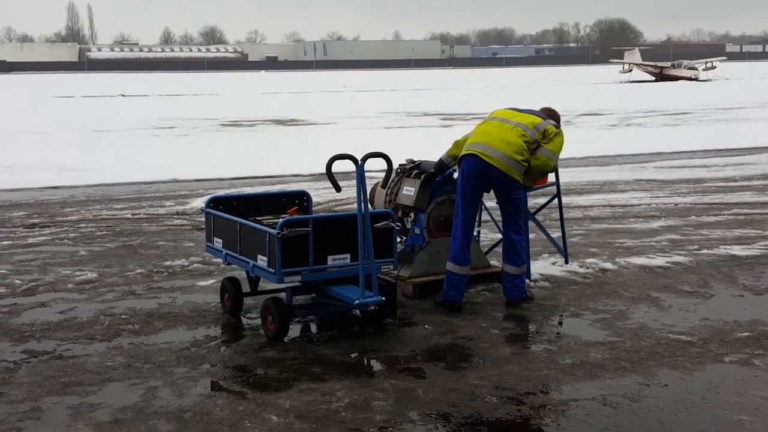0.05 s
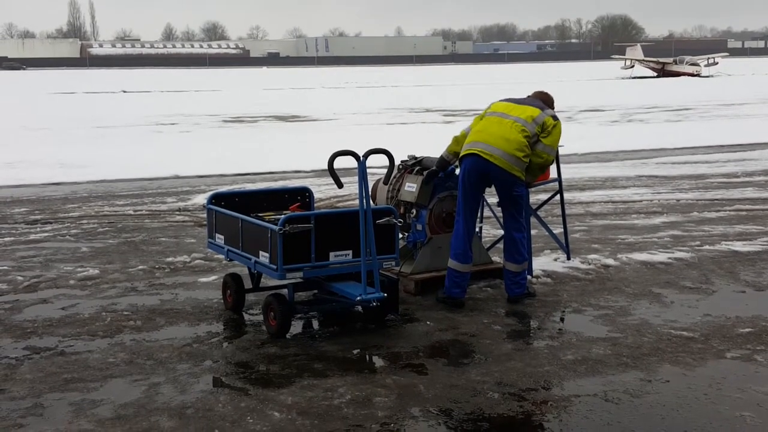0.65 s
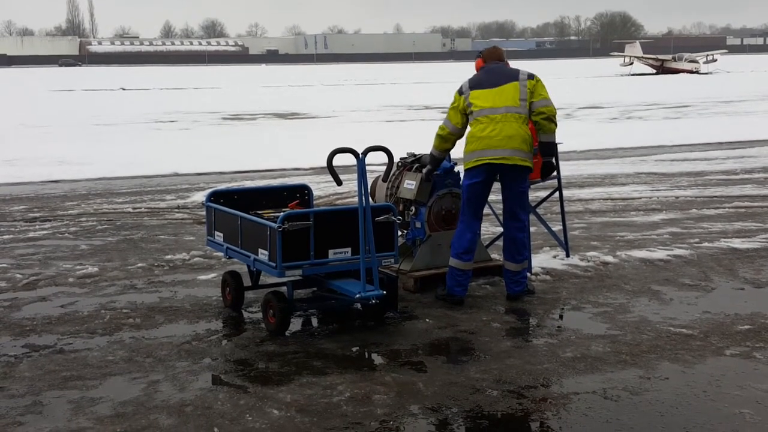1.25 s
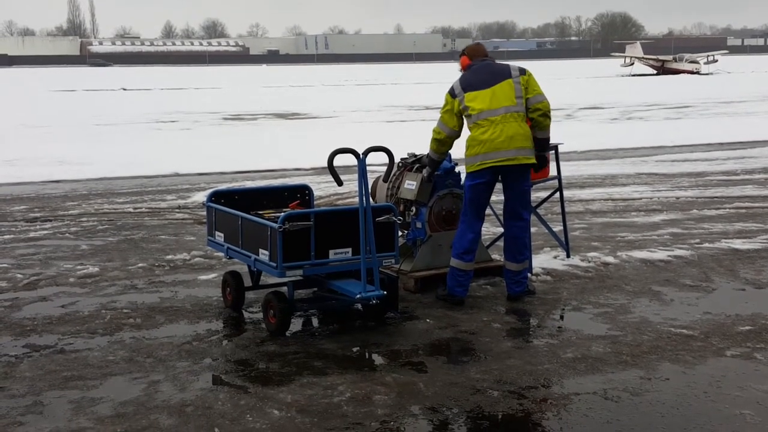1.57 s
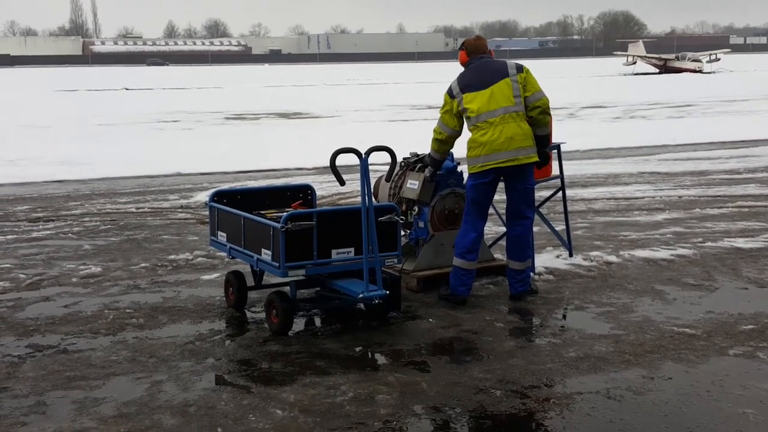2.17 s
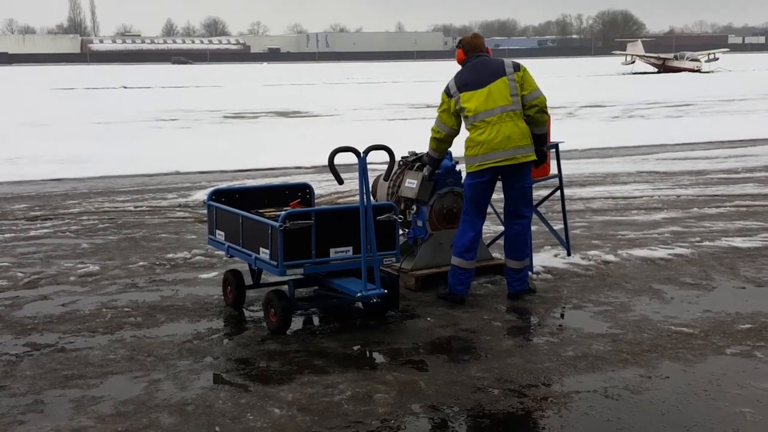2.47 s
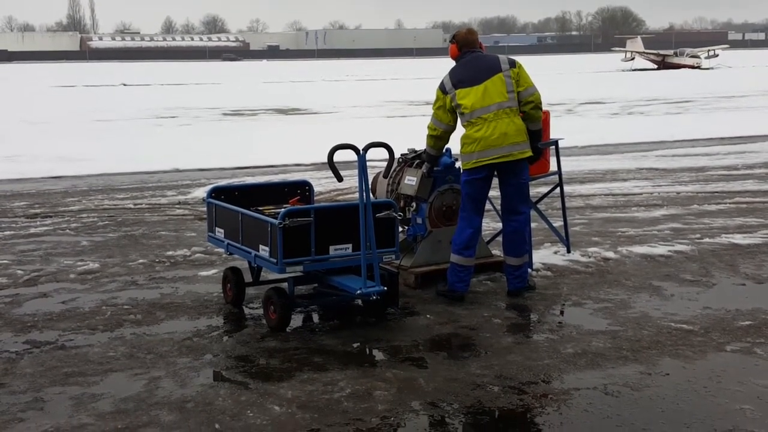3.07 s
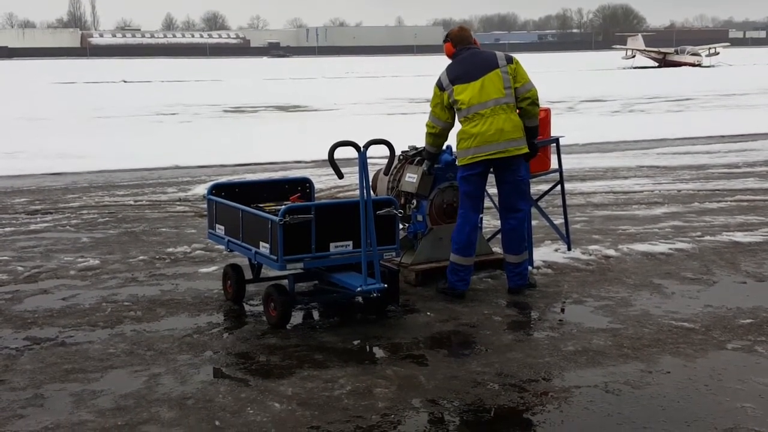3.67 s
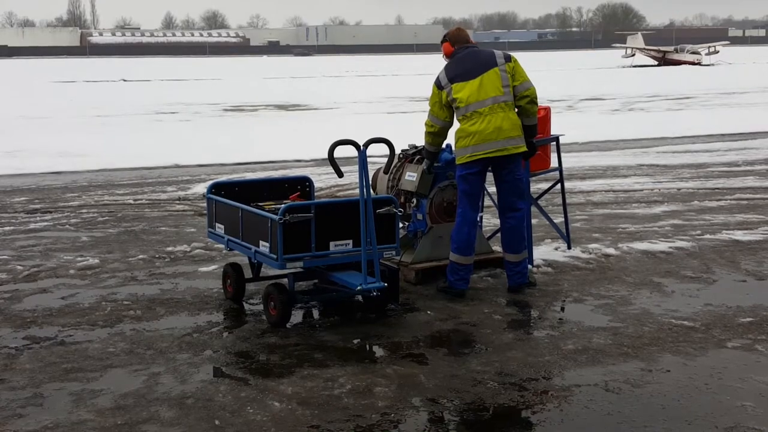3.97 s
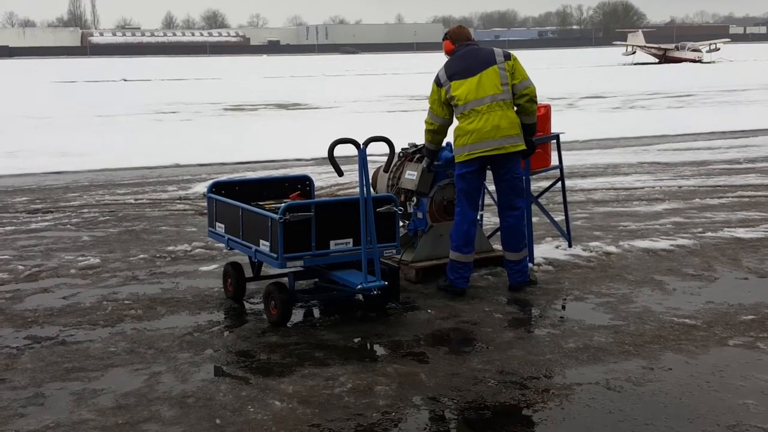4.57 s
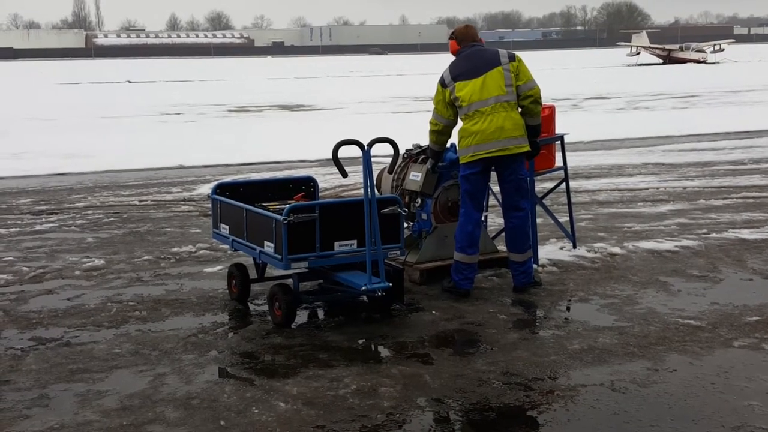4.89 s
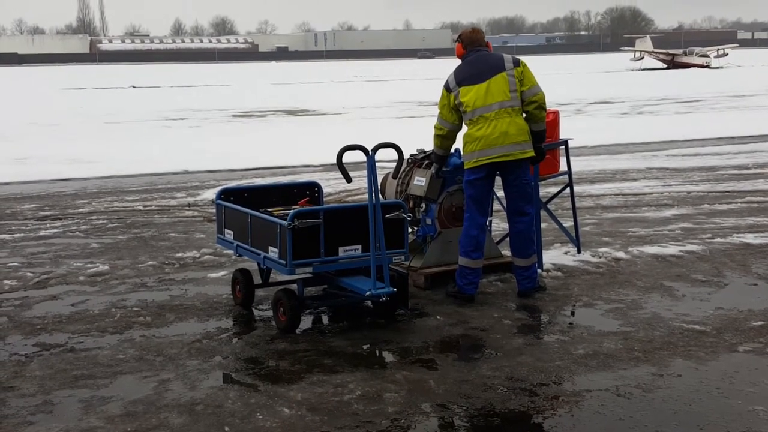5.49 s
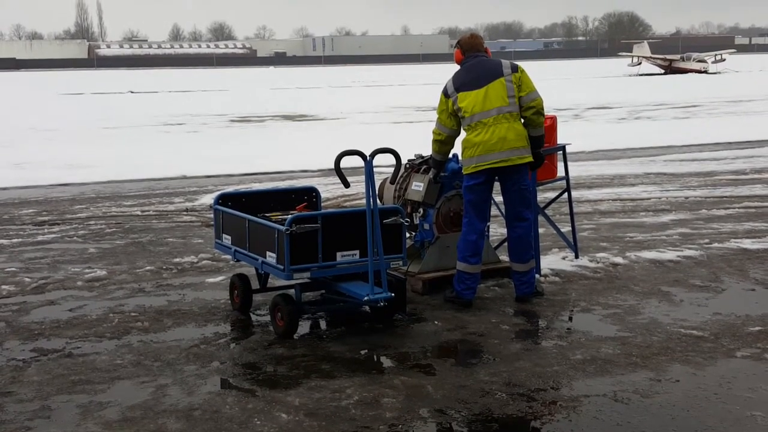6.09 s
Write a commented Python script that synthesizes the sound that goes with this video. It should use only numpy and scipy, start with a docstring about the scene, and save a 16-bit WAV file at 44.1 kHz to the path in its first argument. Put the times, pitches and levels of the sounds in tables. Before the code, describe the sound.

A small gas turbine runs at constant speed outdoors, a few metres from the microphone. Its loud whine and higher whistles flutter, swell and fade over rushing exhaust, a low combustion rumble and a thin intake hiss. Around the middle, wind buffets the microphone and the flame gives a few soft thumps, with more of both near the end. The treble sits mostly to the right.

```python
"""A small gas turbine runs at about 28,500 rpm on a stand in the open, a few metres away.
Its shaft and blades whine at harmonics of the rotation rate, fluttering in the turbulent air and slowly
swelling and fading. Under them combustion rumbles in the flame can, the exhaust jet rushes through the
resonances of its pipe and the intake hisses; the treble lies mostly to the right.
Wind adds a deep buffeting, and now and then the flame surges with a thump."""
import sys
import numpy as np
from scipy import signal
from scipy.fft import rfft, irfft
from scipy.io import wavfile
from scipy.ndimage import uniform_filter1d

SR = 44100
rng = np.random.default_rng(int(sys.argv[2]) if len(sys.argv) > 2 else 0)


def unload_wav(signal):
    """Save mono or channel-first audio to the path in sys.argv[1] as 16-bit WAV at rate SR, clipped to [-1, 1]."""
    wavfile.write(
        sys.argv[1],
        SR,
        np.round(np.clip(np.atleast_2d(signal).T, -1, 1) * 32767).astype(np.int16),
    )


N = 279594

# Shaft speed. Each row: time in seconds, rotation rate in Hz.
SHAFT_SPEED = [(0, 476.3), (.55, 475.92), (1.7, 475.84), (2.4, 475.94), (3.4, 475.89), (3.75, 475.7),
               (4.1, 475.05), (4.65, 474.72), (5.4, 475.24), (6.34, 475.28)]
# Shaft tones. Each row: harmonic number, left and right base levels in dB, flutter depth from 0 to 1.
HARMONICS = [(1, -36, -32, .25), (2, -20.4, -20.3, .13), (3, -33.3, -32.6, .35), (4, -46.5, -44.5, .5),
             (5, -45, -42, .5), (6, -54, -46, .4), (7, -38, -31.3, .33), (8, -36.5, -27.7, .25),
             (9, -53, -37, .42), (10, -55, -39.8, .4), (11, -61, -48, .5), (12, -52.5, -41.7, .5),
             (13, -57, -51, .4), (15, -59, -45.8, .3), (16, -42.5, -29.3, .1), (23, -70, -47, .45),
             (24, -53, -27.2, .28), (25, -61, -38, .35), (26, -68, -45, .4), (27, -70, -50, .4),
             (28, -66, -47, .4), (29, -66, -48, .4), (30, -63, -47, .4), (31, -58, -41, .35),
             (32, -46, -31.2, .22)]
# Swell and fade of the clearer tones, by harmonic number. Each row: time in seconds, gain in dB.
TONE_SWELL = { 1: [(0.0, 2), (0.8, -6), (1.8, -3), (3.3, 4), (4.5, -1.5), (6.34, 0)], 2: [(0.0, 0),
              (0.5, 1.0), (1.2, -1.5), (1.9, 0.5), (2.6, 0), (3.3, -2), (3.9, -0.5), (4.64, 0.5), (5.09, 0),
              (6.34, 1)], 3: [(0.0, 1), (1.42, -1), (1.84, 3), (2.2, 0), (2.34, 3), (2.84, -1.5),
              (3.94, 1.0), (5.4, -3), (6.34, -2)], 7: [(0.0, -3), (0.2, 3), (0.36, -3), (0.76, 0),
              (0.96, 4), (1.1, -10), (1.22, 2), (1.68, -6), (1.76, 2.5), (3.66, 2.5), (3.92, -3.5),
              (4.66, -1.5), (5.7, -4.5), (6.16, 2.5), (6.34, -1)], 8: [(0.0, -18), (0.14, 3), (0.2, -2.5),
              (0.68, 1), (0.88, -9), (1.1, 2.5), (1.44, -9), (1.56, -1), (2.32, -6), (2.56, -6),
              (2.86, -0.5), (3.92, -3.5), (4.0, 0), (4.84, 7), (5.06, 5), (5.64, 5), (5.76, -4), (5.96, 1),
              (6.14, -2.5), (6.34, 6)], 9: [(0, 4), (1.2, 2), (1.5, -4), (1.8, 3), (3.0, 3), (4.0, -8),
              (6.34, -3)], 12: [(0.0, -3), (1.2, 4), (1.7, 0), (2.3, 1), (3.4, -5.5), (4.2, 3), (5.0, 7),
              (6.34, -4)], 16: [(0.0, 3), (0.65, 5.8), (1.04, 4), (1.28, 0), (1.7, 4.5), (2.3, 4.6),
              (2.74, 3.3), (3.05, 5.6), (3.3, .3), (3.6, -1.5), (3.86, -9.5), (4.2, -4), (4.32, -10),
              (4.48, -6.5), (4.57, -12.5), (4.8, -4.5), (5.38, -2), (5.66, -6), (5.86, -2), (6.2, -2),
              (6.34, -7)], 24: [(0.0, -1), (0.3, 2), (1.42, 5), (2.18, -1), (2.62, 4), (2.76, -1),
              (3.56, 5), (3.74, 1.5), (3.82, 4.5), (4.12, -7), (4.2, 1), (4.46, -10), (4.6, -1), (4.76, -3),
              (4.84, 0), (4.94, -11), (5.08, -10), (5.14, 0), (5.28, 2.5), (5.68, 0.5), (5.9, 4), (6.0, -3),
              (6.2, 3), (6.34, -2.5)], 25: [(0, 2), (1.6, -3), (2.5, 5), (3.6, -6), (4.1, 1), (4.8, 3),
              (5.3, -1), (6.34, -4)], 32: [(0.0, 7), (0.34, -2), (0.46, -1), (0.88, 9), (1.0, 7), (1.18, 8),
              (1.52, -9.5), (1.78, 5), (2.24, 1), (2.74, 5), (2.88, -6.0), (3.06, 2), (3.32, 0), (3.42, 4),
              (3.84, 1), (4.02, -8), (4.68, 4), (4.8, -7.0), (4.84, 0), (5.4, -2), (5.52, 1), (5.6, -5),
              (5.84, 3), (5.98, -1.0), (6.02, 5), (6.34, 2)], }
# The same for three whistles at the shaded left ear. Each row: time in seconds, gain in dB.
LEFT_SWELL = { 7: [(0, 0), (.5, 6.5), (1.5, -2), (2.4, -16), (2.9, -15), (4.35, 2), (4.9, -1), (5.35, -7),
              (5.8, -2), (6.34, -6)], 8: [(0, -2), (.45, 6), (.8, -10), (1.3, -1), (1.7, -7), (2.3, 1),
              (3.3, -5), (4.6, 1), (5.25, -5), (6.34, -3)], 16: [(0, -14), (.5, 0), (.85, -4), (1.15, -20),
              (1.55, -4), (2.1, 2), (3.05, 2), (3.35, -8), (4.3, 1.5), (5.65, 3), (6.15, -2), (6.34, -15)],
              }
# Brief dips and flares of the main whine. Each row: centre in seconds, gain in dB, half length in seconds.
WHINE_DIPS = [(.02, -5, .025), (.498, -7, .011), (.858, -9, .012), (1.077, -7, .012), (1.67, -4, .03),
              (2.19, -6, .025), (2.25, 2.3, .035), (2.77, -8.5, .036), (2.86, 1.5, .04), (2.92, -8, .014),
              (2.955, -6, .025), (3.04, 2.5, .04), (3.41, -3, .02), (3.464, -8, .016), (3.85, -6, .012),
              (4.38, 2, .04), (5.115, -6, .025), (5.34, -4, .014), (5.73, -4.5, .018), (5.865, -7, .016)]
# Drifting node of the fundamental. Each row: time in seconds, phase lag at the left ear in radians.
NODE_LAG = [(0, 5.1), (2.9, 4.2), (3.4, 2.7), (6.34, 2.7)]
# Noise at the two ears. Each row: frequency in Hz, left minus right in dB, coherence from 0 to 1,
# left phase lag in radians.
INTERAURAL = [(30, -2, .9, .1), (206, -1, .97, .06), (378, 3.5, .9, .7), (524, -1, .82, .6),
              (650, 1, .9, .3), (1210, -2.5, .85, .9), (1600, -.5, .87, .8), (2050, -1.5, .72, .7),
              (2440, -1.3, .86, .75), (3000, -2.3, .6, 1.2), (3550, -4.5, .25, 1.2), (4200, -9.5, .55, .7),
              (5230, -11.5, .4, .1), (6060, -5, .42, .6), (10000, -24, .1, .4), (12500, -15.5, .15, 0),
              (15500, -12, 0, 0)]
# Strength of combustion. Each row: time in seconds, relative level in dB.
FLAME_LEVEL = [(0.0, -28.5), (0.45, -28.3), (0.52, -31), (0.6, -28), (0.96, -29), (1.58, -29),
               (1.74, -26.8), (2.5, -25.3), (2.95, -24.9), (3.25, -25.3), (3.7, -26.8), (3.85, -29),
               (4.8, -28), (5.0, -25.5), (5.5, -25.8), (5.76, -30.5), (6.2, -26), (6.34, -26.5)]
# Strength of the gas flow. Each row: time in seconds, relative exhaust and intake levels in dB.
GAS_FLOW = [(0.0, -22.2, -40.5), (0.4, -23.1, -41.5), (0.8, -22.8, -40), (1.1, -23.5, -40.5),
            (1.5, -24.8, -46.5), (1.8, -23.7, -42), (2.0, -24, -42.3), (2.25, -22.8, -42.5),
            (2.45, -24.2, -43), (3.44, -25.0, -45), (3.9, -24.2, -42.5), (4.32, -22.8, -41.5),
            (4.5, -24, -42), (4.84, -23.3, -40.5), (5.29, -25.3, -43.5), (5.85, -24.8, -42),
            (6.1, -23.3, -40), (6.34, -24.5, -40.5)]
# Resonances of the flame can (its deepest stands alone) and of the jet pipe.
# Each row: frequency in Hz, width in Hz, relative peak in dB.
DEEPEST_CAN_MODE = (155.3, 27, -6)
CAN_MODES = [(186.2, 55, -0.5), (219.7, 45, 2), (291.8, 15.3, -0.5), (334, 39, -8.5), (384.4, 50, -4),
             (441, 82, -9)]
JET_PIPE_MODES = [(601, 76, -1), (680, 106, 0.5), (942, 182, 2.5), (1263, 130, -4.5), (1638, 350, 2.5),
                  (1890, 103, 0.5), (2380, 340, 0.5), (3096, 75, -5), (3937, 320, -3), (4460, 150, -4.5),
                  (5180, 105, -6)]
# Broad spectra of burner, jet, intake and wind. Each row: frequency in Hz, relative density in dB.
RUMBLE_SPECTRUM = [(15, -55), (60, -32), (110, -26), (300, -24), (500, -27), (900, -78)]
JET_SPECTRUM = [(300, -27), (520, -9), (800, -3), (1150, -6.5), (1400, -5.5), (2600, -5.5), (3300, -8.5),
                (3700, -8.5), (4200, -5.5), (5200, -9), (6700, -17), (7700, -16), (8400, -35.5),
                (11000, -96)]
HISS_SPECTRUM = [(8500, -42), (9400, -26.5), (10000, -7.5), (10700, -1), (11150, 6), (11420, 5.5),
                 (11700, 7), (12200, 0), (13000, 3.5), (16000, -1)]
WIND_SPECTRUM = [(12, -34), (30, -20), (60, 0.5), (100, 4), (150, 3.5), (260, -15), (600, -54)]
# Gusts. Each row: centre in seconds, rise over the breeze in dB, half length in seconds.
WIND_GUSTS = [(2.77, 8, .16), (3.17, 10, .27), (3.6, 6, .09), (5.32, 6, .08)]
# Flame surges. Each row: centre in seconds, peak in dB, half length in seconds, ringing frequency in Hz.
FLAME_SURGES = [(2.89, -18.5, .02, 212), (2.995, -24, .022, 205), (3.135, -22.5, .022, 196),
                (3.345, -15.5, .022, 188), (4.41, -24, .03, 219), (5.103, -16.5, .021, 203),
                (6.247, -18, .024, 216)]

GUST_SHADE = 0.28  # dB lost per dB of gust by the low tones on the left and by the pipe's drone


def undb(db):
    """Amplitude ratio for a level in decibels."""
    return 10 ** (np.asarray(db) / 20)


def unit(x):
    """Normalisation to an rms of 1."""
    return x / np.sqrt(np.mean(np.abs(x) ** 2))


def curve(rows, axis=1):
    """Linear interpolation of one column of a time table at every sample."""
    rows = np.array(rows)
    return np.interp(np.arange(N) / SR, rows[:, 0], rows[:, axis])


def bumps(rows):
    """Superposition of Gaussian pulses, one for each row of centre, height and half length."""
    t = np.arange(N) / SR
    return sum(height * np.exp(-((t - at) / half_s) ** 2) for at, height, half_s in rows)


def wander(count):
    """Slow random modulation: `count` random levels joined smoothly, with an rms of 1."""
    steps = np.interp(np.linspace(0, count - 1, N), np.arange(count), rng.standard_normal(count))
    return unit(uniform_filter1d(steps - steps.mean(), N // count // 2))


def bins():
    """Frequencies in Hz of the Fourier spectrum of the whole sound."""
    return np.maximum(np.arange(N // 2 + 1) * SR / N, 1)


def colour(rows, axis=1):
    """Interpolation of one column of a frequency table over log frequency, at every bin."""
    rows = np.array(rows)
    return np.interp(np.log(bins()), np.log(rows[:, 0]), rows[:, axis])


def resonances(modes):
    """Power response of steep-sided resonances, whose powers add."""
    f = bins()
    return sum(undb(db) ** 2 / (1 + ((f - hz * hz / f) / width) ** 2) ** 2 for hz, width, db in modes)


def turbulence(gain):
    """Coloured noise at two ears: coherent in the bass, largely incoherent and shaded left in the treble."""
    shared, own = rfft(rng.standard_normal((2, N)))
    coherence = np.clip(colour(INTERAURAL, axis=2), 0, 1)
    delayed = shared * np.exp(-1j * colour(INTERAURAL, axis=3))
    left = (coherence * delayed + np.sqrt(1 - coherence ** 2) * own) * undb(colour(INTERAURAL))
    pair = irfft(np.array([left, shared]) * gain, N)
    return pair / np.std(pair.mean(axis=0))


def eddies(corner_hz=25.5, hop=32):
    """Scattering by eddies: a complex random modulation of amplitude and phase, strongest at slow rates."""
    count = N // hop + 1
    rate_hz = np.abs(np.fft.fftfreq(count, hop / SR))
    noise = rng.standard_normal(count) + 1j * rng.standard_normal(count)
    band = rate_hz / (rate_hz + 2) / np.sqrt(1 + (rate_hz / corner_hz) ** 2)
    wobble = unit(np.fft.ifft(noise * band))
    return np.interp(np.arange(N) / hop, np.arange(count), wobble)


def swell(k, weak_db=-2.5, waver_db=0.16, shimmer_db=0.8):
    """Amplitude modulation of harmonic k in dB: weak tones wander, the main whine dips, others shimmer."""
    if k not in TONE_SWELL:
        return 2 * wander(24) + weak_db
    if k == 2:  # the main whine
        return curve(TONE_SWELL[k]) + bumps(WHINE_DIPS) + waver_db * wander(200)
    return curve(TONE_SWELL[k]) + shimmer_db * wander(130)


def whine(left_scatter=1.6):
    """Rotation radiates a harmonic series, every eighth a blade tone; hot, moving air makes it flutter."""
    shaft_angle = 2 * np.pi * np.cumsum(curve(SHAFT_SPEED)) / SR
    out = np.zeros((2, N))
    for k, left_db, right_db, flutter in HARMONICS:
        tone = np.exp(1j * (k * shaft_angle + rng.uniform(0, 2 * np.pi)))
        right = unit(tone * (1 + flutter * eddies())) * undb(swell(k))
        if k < 6:  # long waves reach both ears alike, except in gusts
            left = right * undb(-GUST_SHADE * bumps(WIND_GUSTS))
        else:  # short waves scatter differently on each path
            fade_db = curve(LEFT_SWELL[k]) if k in LEFT_SWELL else 2 * wander(24)
            left = unit(tone * (1 + left_scatter * flutter * eddies())) * undb(fade_db)
        lag_rad = curve(NODE_LAG) if k == 1 else min(0.04 * k, 0.7)
        out[0] += undb(left_db) * (left * np.exp(-1j * lag_rad)).real
        out[1] += undb(right_db) * right.real
    return np.sqrt(2) * out


def burner(churn_db=0.5, deep_db=-11.5, deep_growth=1.9):
    """Forced resonance: unsteady combustion drives the flame can, its deepest mode growing fastest."""
    flame_db = curve(FLAME_LEVEL) + churn_db * wander(50)
    excess_db = flame_db - flame_db.mean()
    deep = turbulence(np.sqrt(resonances([DEEPEST_CAN_MODE]))) * undb(deep_db + deep_growth * excess_db)
    main_pair = turbulence(np.sqrt(resonances(CAN_MODES[:2]))) * undb(excess_db)
    # the upper modes and broad rumble follow the gas flow, churn and dip a little with the whine
    roar = turbulence(np.sqrt(resonances(CAN_MODES[2:]) + undb(colour(RUMBLE_SPECTRUM)) ** 2))
    roar_db = curve(GAS_FLOW) - 7.5 + wander(90) + 0.3 * bumps(WHINE_DIPS)
    return (deep + main_pair) * undb(flame_db.mean() - 0.7) + roar * undb(roar_db)


def exhaust(drone_db=-34.5, rush_gain_db=1.21, rasp_db=0.3):
    """Jet noise filtered by pipe resonance: a rasping rush over two low modes that fade in gusts."""
    drone = turbulence(np.sqrt(resonances(JET_PIPE_MODES[:2])))
    drone *= undb(drone_db - GUST_SHADE * bumps(WIND_GUSTS))
    rush = turbulence(np.sqrt(resonances(JET_PIPE_MODES[2:]) + undb(colour(JET_SPECTRUM)) ** 2))
    rush *= undb(curve(GAS_FLOW) + rasp_db * wander(300) + rush_gain_db)
    return drone + rush


def intake(gain_db=6.5, waver_db=0.6):
    """Broadband blade noise: air torn by the compressor hisses around the highest tones."""
    hiss = turbulence(undb(colour(HISS_SPECTRUM)))
    return hiss * undb(curve(GAS_FLOW, axis=2) + waver_db * wander(90) + gain_db)


def wind(breeze_db=-52, ragged_db=2.5, own_share=0.45):
    """Turbulent pressure fluctuations: gusty air buffets raggedly, partly at each ear alone."""
    spectrum = undb(colour(WIND_SPECTRUM))
    own = unit(irfft(rfft(rng.standard_normal((2, N))) * spectrum, N))
    air = np.sqrt(1 - own_share ** 2) * turbulence(spectrum) + own_share * own
    return air * undb(breeze_db + bumps(WIND_GUSTS) + ragged_db * wander(70))


def flame_thumps():
    """Thermoacoustic oscillation: the flame locks onto a resonance of the can for a few cycles."""
    t = np.arange(N) / SR
    out = np.zeros(N)
    for at, peak_db, half_s, ring_hz in FLAME_SURGES:
        envelope = bumps([(at, undb(peak_db), half_s)])
        out += envelope * np.sin(2 * np.pi * (ring_hz * t + rng.random()))
    return out


def scene():
    """Superposition in the open air, with no walls to reflect the sound."""
    return whine() + burner() + exhaust() + intake() + wind() + flame_thumps()


def record(dry, cutoff_hz=15600):
    """Band limiting: a steep elliptic low-pass filter removes the highest treble."""
    return signal.sosfilt(signal.ellip(12, 0.1, 80, cutoff_hz, fs=SR, output="sos"), dry)


dry = scene()
out = record(dry)
unload_wav(out)
```